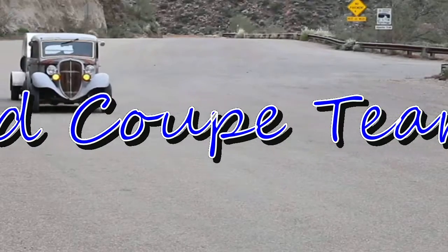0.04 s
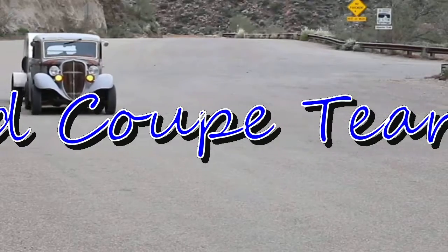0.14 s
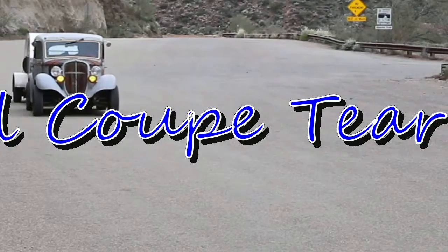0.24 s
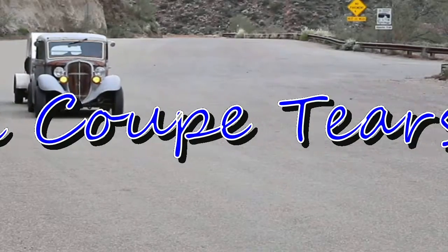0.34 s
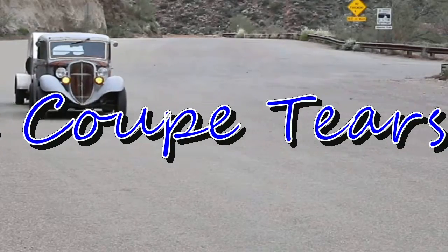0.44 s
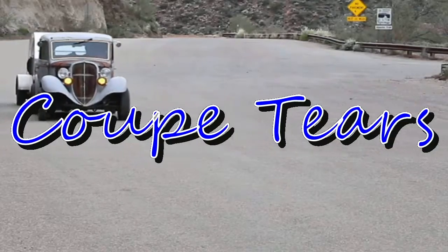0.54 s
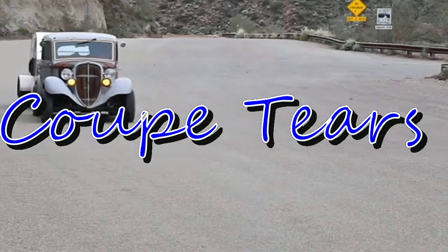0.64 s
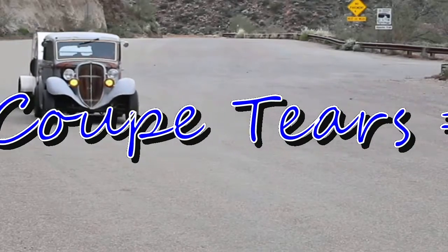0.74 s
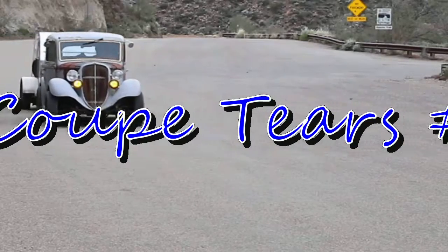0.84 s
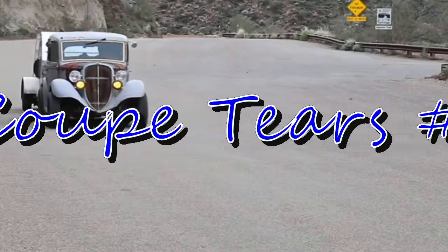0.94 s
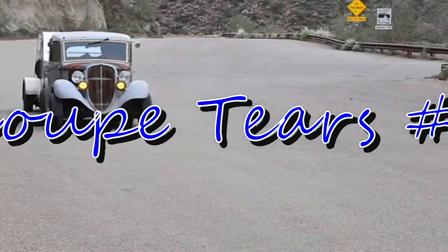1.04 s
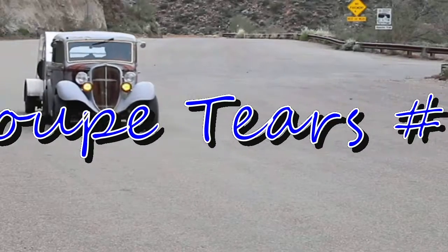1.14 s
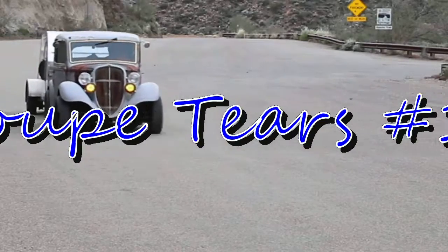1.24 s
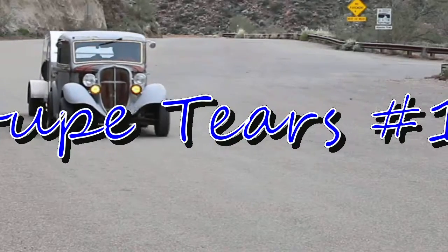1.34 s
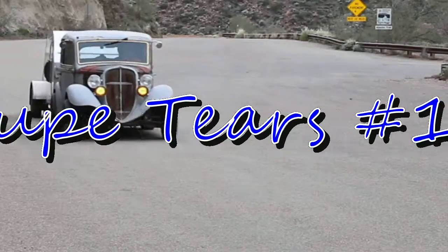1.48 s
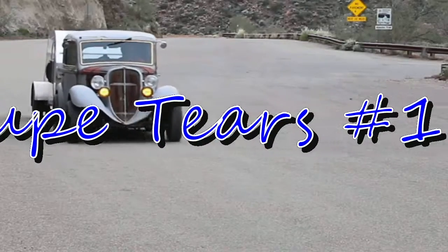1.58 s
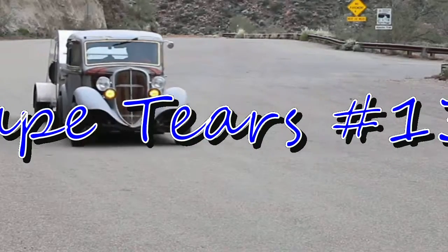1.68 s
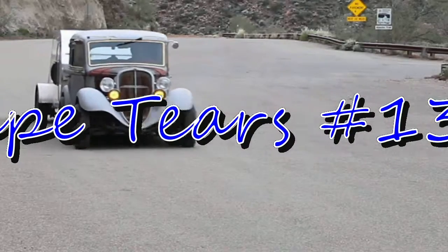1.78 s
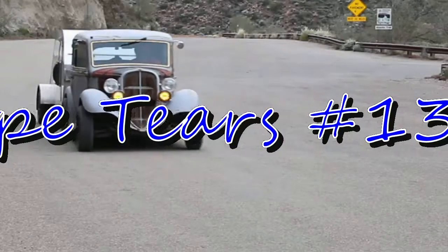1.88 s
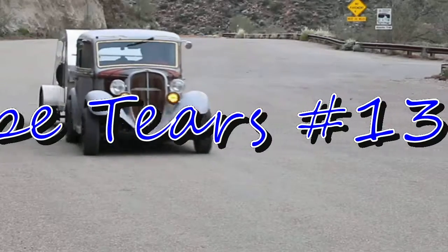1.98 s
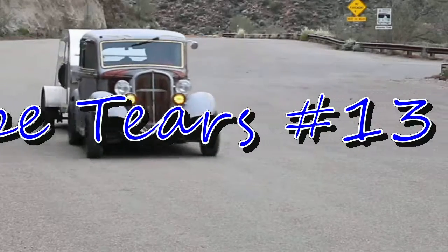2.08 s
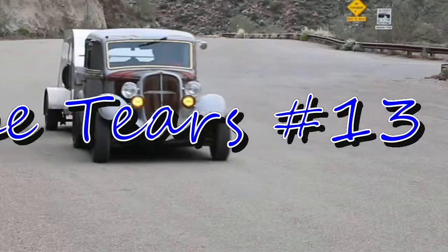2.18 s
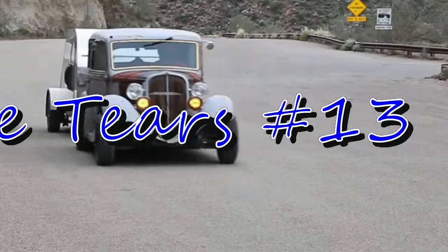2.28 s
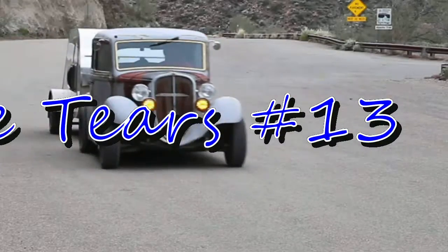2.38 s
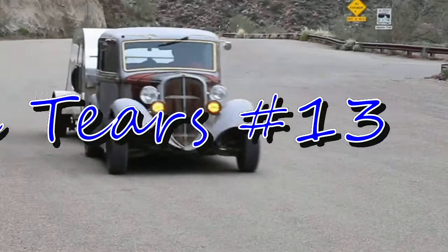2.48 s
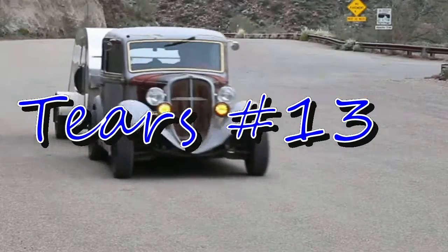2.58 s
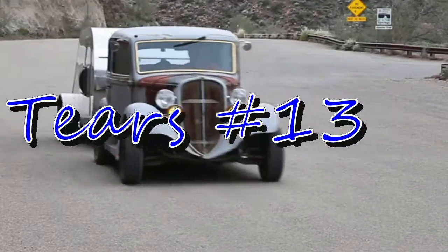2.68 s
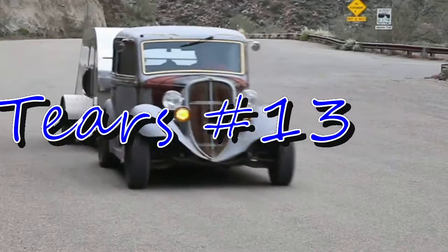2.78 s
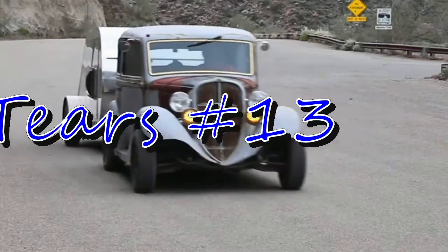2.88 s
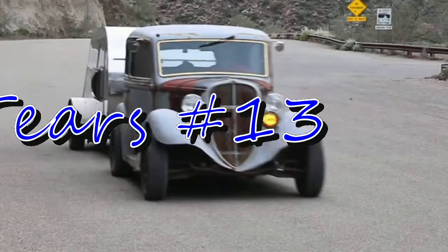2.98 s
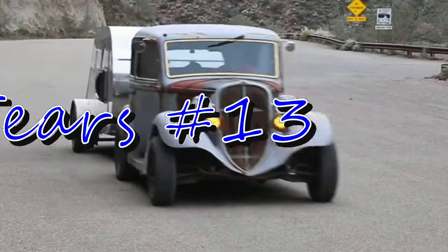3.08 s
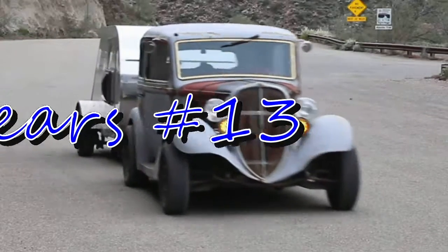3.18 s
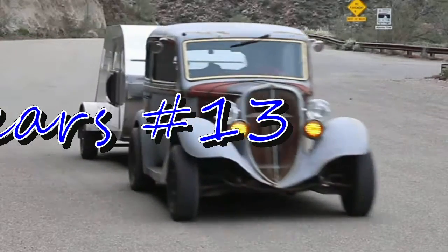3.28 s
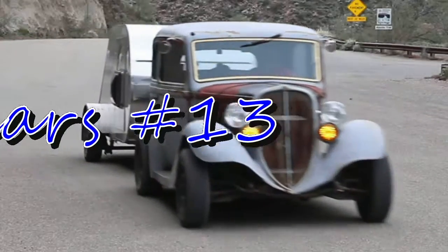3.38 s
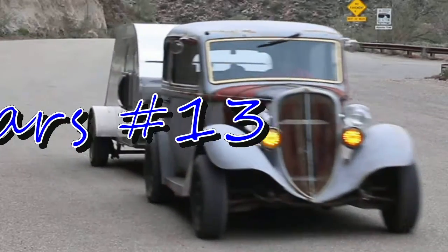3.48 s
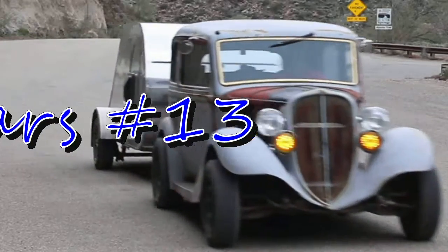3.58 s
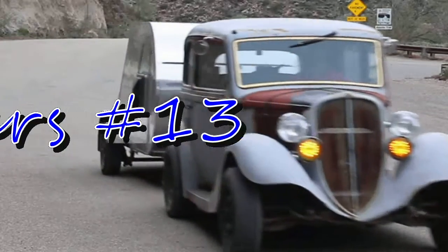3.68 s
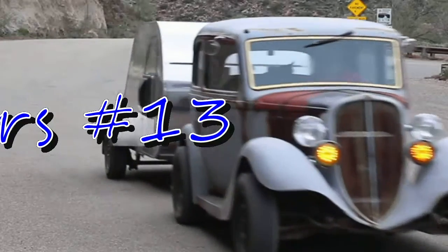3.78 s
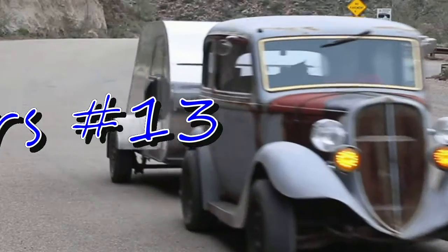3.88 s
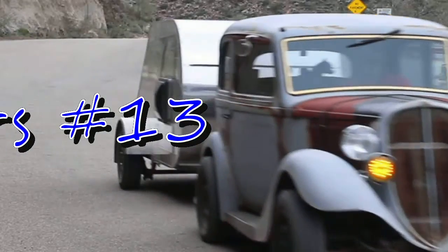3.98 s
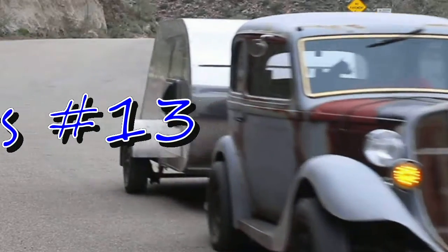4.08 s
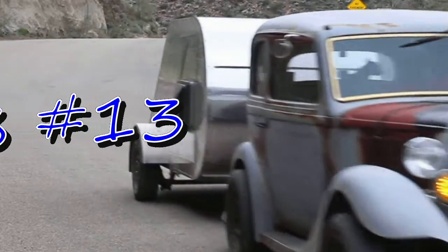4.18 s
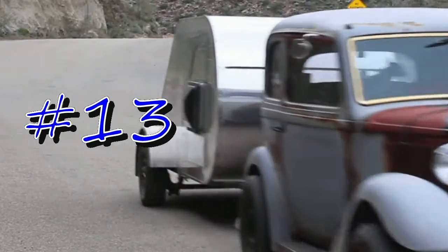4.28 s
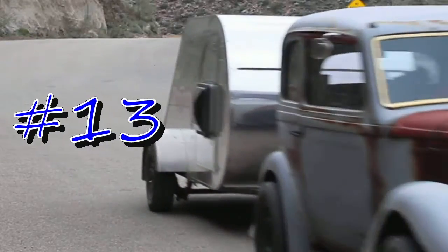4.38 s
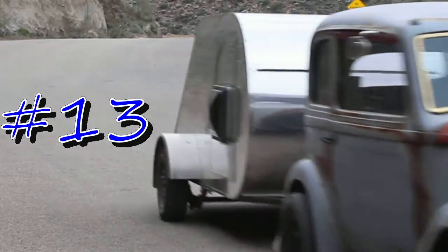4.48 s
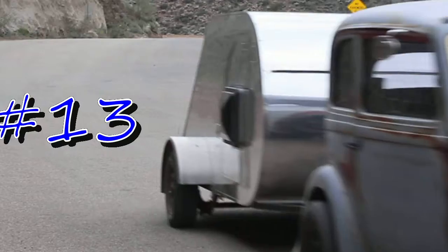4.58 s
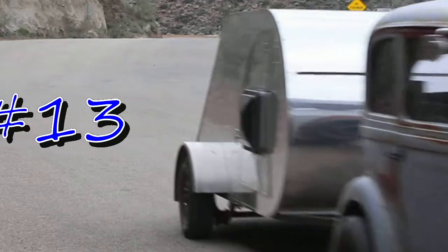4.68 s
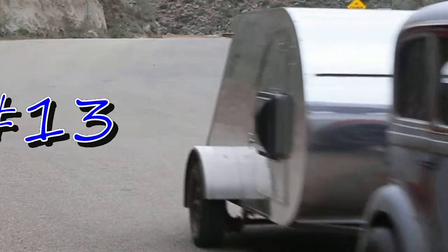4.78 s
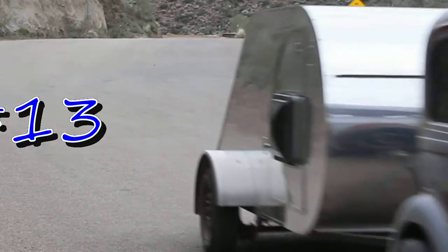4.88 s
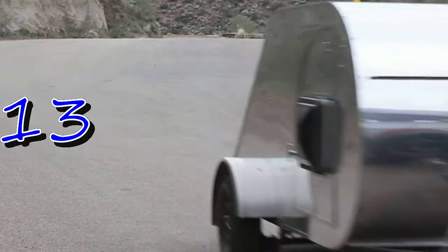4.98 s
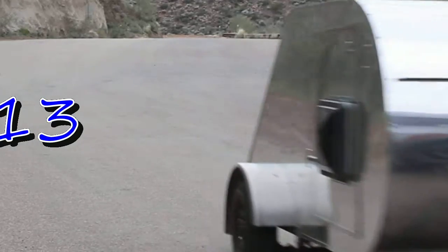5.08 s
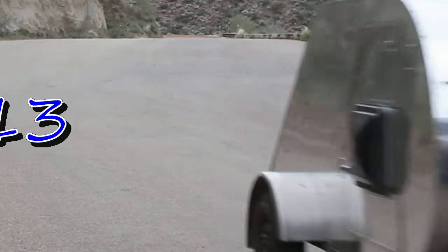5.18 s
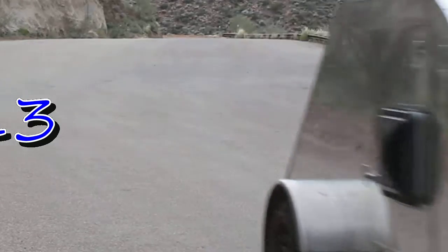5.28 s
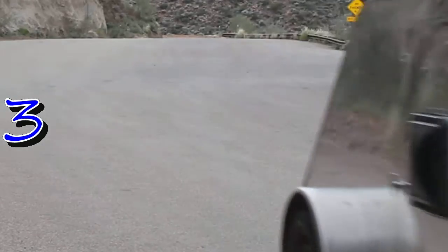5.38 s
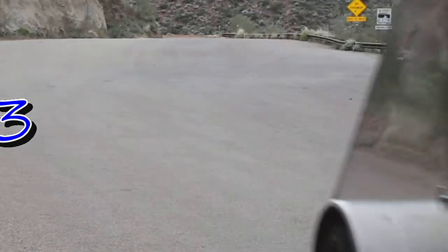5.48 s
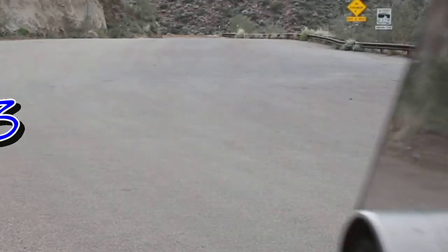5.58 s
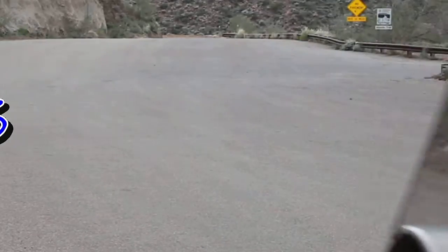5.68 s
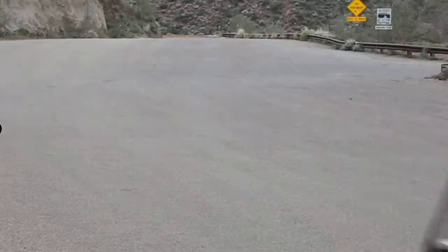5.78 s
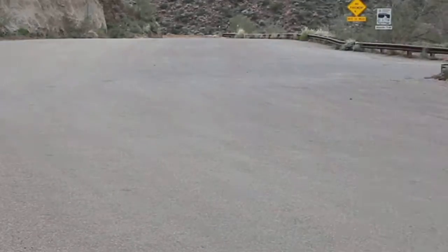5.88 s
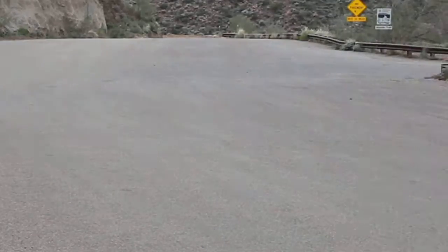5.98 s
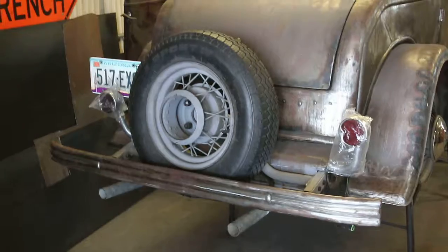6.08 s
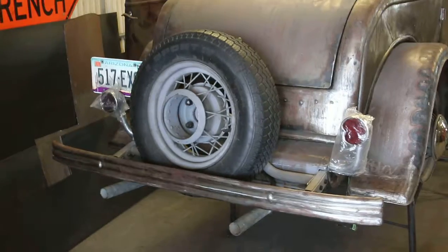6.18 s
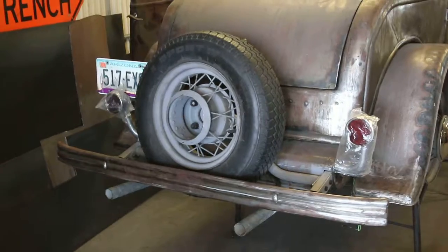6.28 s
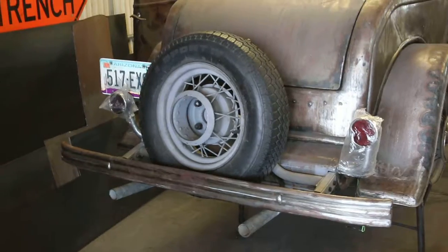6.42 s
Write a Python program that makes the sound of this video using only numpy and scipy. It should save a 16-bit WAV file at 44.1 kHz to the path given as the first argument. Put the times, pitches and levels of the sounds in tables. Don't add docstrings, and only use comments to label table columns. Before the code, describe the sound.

Low engine hum and tyre roar approach, grit crackles loudest as the car and trailer pass, exhaust sputters away, and an indoor room cuts in.

```python
import sys
import numpy as np
from scipy import signal
from scipy.fft import rfft, irfft, next_fast_len
from scipy.io import wavfile

SR = 44100
rng = np.random.default_rng(int(sys.argv[2]) if len(sys.argv) > 2 else 0)


def undo_db(level):
    steps = np.asarray(level, float) / 20
    return 10 ** steps


def to_wav(sig):
    pcm = np.clip(np.atleast_2d(sig), -1, 1) * 32767
    pcm = np.round(pcm).astype(np.int16)
    wavfile.write(sys.argv[1], SR, pcm.T)


N = 284445
TIME = np.arange(N) / SR
PADDED = next_fast_len(N + 4096)
BINS_HZ = np.maximum(np.fft.rfftfreq(PADDED, 1 / SR), 1)
SPEED_M_PER_S, PASSES_AT_M = 2.84, 2.53


def rms_one(x):
    return x / np.sqrt(np.mean(x ** 2) + 1e-20)


def in_time(rows):
    s, *columns = np.transpose(rows)
    return [np.interp(TIME, s, c) for c in columns]


def over_hz(rows):
    hz, *columns = np.transpose(rows)
    return [np.interp(np.log(BINS_HZ), np.log(hz), c) for c in columns]


def shaped(x, response):
    return irfft(rfft(x, PADDED) * response, PADDED)[..., :N]


def highpass(x, hz, order=2):
    return signal.sosfilt(signal.butter(order, hz, "high", fs=SR, output="sos"), x)


def drift(rate_hz):
    r = np.exp(-80 * np.pi * rate_hz / SR)
    slow = signal.lfilter([1], [1, -2 * r, r * r], rng.standard_normal(N // 40 + 2002))
    slow = rms_one(slow[2000:])
    return np.interp(np.arange(N) / 40, np.arange(len(slow)), slow)


def ring(clicks, hz, t60):
    r, w = undo_db(-60 / (t60 * SR)), 2 * np.pi * hz / SR
    return signal.lfilter([0, np.sin(w)], [1, -2 * r * np.cos(w), r * r], clicks + 1e-18)


def ports(common, own, rows):
    lead, balance_db, alike = over_hz(rows)
    alike = np.clip(alike, 0, 1)
    left = undo_db(balance_db / 2) * np.exp(.5j * lead)
    right = undo_db(-balance_db / 2) * np.exp(-.5j * lead)
    pair = np.array([left, right])
    mid = .5 * np.sqrt(alike * abs(pair.sum(0)) ** 2 + (1 - alike) * (abs(pair) ** 2).sum(0))
    shared = shaped(common, pair * np.sqrt(alike) / mid)
    return shared + shaped(own, abs(pair) * np.sqrt(1 - alike) / mid)


def hiss(spectrum, patchy_db, grain):
    hits = rng.random((3, N)) < 900 / SR
    heights = undo_db(4.7 * np.minimum(rng.exponential(1, (3, N)), 5))
    sparse = rms_one(hits * heights * rng.choice([-1, 1], (3, N)))
    raw = np.sqrt(1 - grain) * rng.standard_normal((3, N)) + np.sqrt(grain) * sparse
    flicker = undo_db(patchy_db * (.5 * drift(1.4) + drift(4.4)))
    return rms_one(shaped(raw, undo_db(over_hz(spectrum)[0]))) * flicker


def smooth_step(at_s):
    return .5 + .5 * np.tanh((TIME - at_s) / 0.11)


def heard(db, abreast_s, share, step_db, step_s):
    along = SPEED_M_PER_S * (TIME - abreast_s) / PASSES_AT_M
    return db - share * 10 * np.log10(1 + along ** 2) + step_db * smooth_step(step_s)


def swells(rows, width_s):
    return sum(db * np.exp(-((TIME - s) / width_s) ** 2) for s, db in rows)


def pings(rows, length_s):
    out, near = np.zeros(N), np.arange(-4000, 4000) / SR
    for (s, db, hz), turn in zip(rows, rng.random(len(rows))):
        bell = np.exp(-(near / length_s) ** 2)
        out[round(s * SR) - 4000:][:8000] += undo_db(db) * bell * np.sin(2 * np.pi * (hz * near + turn))
    return out


def garage_air(from_s):
    # (frequency [Hz], density [dB per Hz])
    rumble = [(24, -73), (40, -33), (136, -5), (261, -8), (353, -4), (390, -4.5), (442, -11.5),
              (766, -14.5), (825, -19), (1030, -14), (3440, -24.5), (4640, -38.5), (15800, -55)]
    # (frequency [Hz], width [Hz], level [dB], starts at [s])
    tones = [(1000, 900, -68, 6.11), (119, 8, -60, 6.2), (145.4, 9.1, -57, 6.11), (222, 10, -59.5, 6.11),
             (290, 10, -71, 6.11), (450, 13, -63.5, 6.11), (691, 14, -70, 6.25), (765, 14, -71.5, 6.15),
             (2700, 50, -70, 6.3)]
    # (frequency [Hz], left leads [radians], left-right [dB], likeness [0-1])
    room_ports = [(60, 0, -1.5, 1), (503, 0.0038, 1, 0.99), (1410, 0, 0, 0.74), (3000, 0.0018, -3, 0.13),
                  (8000, 0, -0.5, .05), (15000, 0.00082, 0.5, 0.15)]
    air = undo_db(-54) * hiss(rumble, patchy_db=0.8, grain=0.071)
    white = rng.standard_normal((3, N))
    for hz, width, db, s in tones:
        tone = rms_one(ring(white, hz, 2.2 / width))
        air = air + undo_db(db) * tone * np.clip((TIME - s) / 0.01, 0, 1)
    air = highpass(air, 70, order=4) + motor_whirs(from_s) * [[1], [.3], [.3]]
    fade_in = np.clip((TIME - from_s) / 0.29, 0, 2) ** 0.94
    return ports(air[0], air[1:], room_ports) * fade_in


def motor_whirs(from_s):
    # (time [s], length [s], frequency [Hz], glide [Hz per s], level [dB])
    lines = [
        (6.12, .13, 1500, -800, -67),
        (6.3, .05, 1290, 1500, -69),
        (6.335, 0.12, 2020, -500, -64.5),
        (6.275, .04, 3380, 0, -68),
        (6.33, .06, 3330, 0, -64),
        (6.325, .06, 3545, 0, -68),
        (6.22, 0.105, 380, -100, -58.5),
        (6.33, .13, 352, -60, -60.5),
        (6.385, .08, 985, 0, -68),
        (6.25, 0.065, 2900, 0, -71),
    ]
    out, first = np.zeros(N), round(from_s * SR)
    for s, length, hz, glide, db in lines:
        since = TIME[first:] - s
        wander = np.cumsum(rng.standard_normal(len(since))) * 0.063 * np.sqrt(hz / SR)
        edges = np.clip(np.minimum(since, length - since) / .015, 0, 1)
        phase = 2 * np.pi * (hz + .5 * glide * since) * since + wander
        out[first:] += undo_db(db) * np.sqrt(2) * edges * np.sin(phase)
    return out


def garage_ticks():
    # (time [s], peak [dB], left-right [dB], pitch [ratio])
    knocks = [
        (6.2624, -35, -7, 0.96),
        (6.285, -48, 2, .95),
        (6.4253, -32, -6, 0.875),
        (6.4482, -49, -1, 1.6),
    ]
    # (frequency [Hz], level [dB], t60 [s])
    modes = [(2000, -19, 0.0051), (2500, -15, 0.0047), (2900, -4.5, 0.011), (3740, 2.5, 0.0077),
             (4600, -12, 0.0035), (6300, -5.5, 0.0044), (12800, -20, 0.0027)]
    lag_at_1khz_s = .002
    out = np.zeros((2, N))
    for s, db, pan_db, pitch in knocks:
        at = round(s * SR)
        for k, (hz, mode_db, t60) in enumerate(modes):
            clicks = np.zeros((2, min(900, N - at)))
            starts = rng.integers(0, 4, 2) + round(lag_at_1khz_s * SR * 1000 / hz)
            heights = undo_db(db + mode_db - 8.0 + pan_db * np.array([.5, -.5]))
            clicks[[0, 1], starts] = -(-1) ** k * heights
            out[:, at:at + 900] += ring(clicks, hz * pitch ** (hz < 5000), t60)
    return out


def garage():
    return garage_air(from_s=6.106) + garage_ticks()


def preamp_hiss():
    # (frequency [Hz], density [dB per Hz])
    colour = [(3000, -18), (8000, -3), (16500, -6)]
    return undo_db(-76.5) * hiss(colour, patchy_db=1.5, grain=0.011)


def tyre_roar(burst):
    # (frequency [Hz], density [dB per Hz])
    roar_colour = [(70, -22), (120, -9), (200, -13.5), (232, -4), (280, -8.5), (344, -6.5), (414, -12),
                   (654, -15), (1100, -21.5), (1430, -25), (2420, -120)]
    # (frequency [Hz], density [dB per Hz])
    rumble_colour = [(18, 21), (35, 11), (62, -3), (160, -24), (220, -37), (400, -46)]
    roar_db = heard(-51.5, abreast_s=4, share=.5, step_db=-4.5, step_s=5.5)
    roar = undo_db(roar_db) * hiss(roar_colour, patchy_db=0.2, grain=0.045) * (1 + 0.052 * burst)
    rumble = undo_db(-64 + 0.02 * (roar_db + 52)) * hiss(rumble_colour, patchy_db=0.0, grain=0.013)
    body_db = heard(-61, abreast_s=4.5, share=1.5, step_db=-3, step_s=4)
    body_width_hz = 31
    body = rms_one(ring(rng.standard_normal((3, N)), 789, 4.2 / body_width_hz))
    return roar + rumble + undo_db(body_db) * body * [[1], [.5], [.5]]


def rushing_air():
    # (frequency [Hz], density [dB per Hz])
    colour = [(5000, -6), (6500, -2.5), (8000, -3), (9300, -6.5), (11000, -10.5), (14000, -23), (16500, -9)]
    air_db = heard(-68.3, abreast_s=4, share=0.84, step_db=8, step_s=5)
    return undo_db(air_db + 1.3 * drift(9)) * hiss(colour, patchy_db=1.2, grain=.07)


def manifold_fizz(angle):
    # (frequency [Hz], density [dB per Hz])
    colour = [(8500, -35), (9800, 1), (12000, 1), (13500, 3), (14800, 4), (16500, -2)]
    leads_cycles = .27
    fizz_db = heard(-74, abreast_s=5.0, share=2, step_db=-8, step_s=6)
    spit = puffs(angle + 2 * np.pi * leads_cycles)
    return undo_db(fizz_db) * spit * hiss(colour, patchy_db=2.3, grain=.2)


def grit_tread(burst):
    # (frequency [Hz], density [dB per Hz])
    colour = [(530, -10.5), (900, 1), (1100, -3.5), (1530, -2), (3290, -7), (4070, -8.5), (5030, -10.5),
              (6450, -18.5), (7500, -28), (9750, -32), (16500, -120)]
    # (time [s], level [dB])
    patches = [(1.1, 1.7), (1.84, 4.8), (1.89, 2), (2.13, 3.2), (2.26, 2.3), (2.49, 2.07), (2.6, 4.5),
               (3.29, 3), (3.655, 1.5), (4.185, 4.1), (4.265, 3.1), (4.62, 1.44), (2.9, 2.1), (5.41, 2.1)]
    grit_db = heard(-50.77, abreast_s=5, share=1.0026, step_db=-0.02, step_s=8) + swells(patches, 0.016)
    tread = hiss(colour, patchy_db=0.3, grain=0.063)
    coarse = signal.sosfilt(signal.butter(2, 2500, fs=SR, output="sos"), tread)
    coarse_db = 1.0 * drift(12.5) - 3.5 * smooth_step(5.27)
    fine_db = 1.3 * drift(9.8) - 2.5 * np.clip(1 - TIME / 3, 0, 1)
    fine = (tread - coarse) * undo_db(fine_db) * (1 + 0.068 * (burst - burst.mean()))
    return undo_db(grit_db) * (coarse * undo_db(coarse_db) + fine)


def stone_snaps():
    # (time [s], peak [dB], frequency [Hz], crack [dB])
    stones = [(0.126, -47, 1810, 2), (0.249, -50, 2130, -3), (.8375, -49, 1790, -6), (.8844, -50, 2140, -3),
              (1.109, -50, 2240, 4), (1.831, -42, 1860, -3), (1.8682, -51, 1940, -5),
              (1.9011, -45, 2190, -6), (2.114, -44, 3550, 1), (2.589, -41.5, 2050, -1),
              (2.7546, -45, 1620, -6), (2.8864, -52, 1870, 8), (3.5437, -38, 2300, 2),
              (3.825, -42, 2863, 6), (4.1744, -33.5, 2200, 2), (4.2457, -28, 2000, -5),
              (4.2594, -34.5, 2150, -4), (4.5227, -34, 1560, -9), (4.596, -27.5, 1950, 1.5),
              (4.6203, -33, 2000, -5), (4.6941, -36, 2220, -8), (4.6993, -35, 2100, -6),
              (4.8785, -39, 1800, -6), (4.8825, -39, 2400, 9), (5.03, -39, 2620, -6),
              (5.392, -32, 1500, -9), (5.3967, -34.5, 2380, 2), (5.4246, -37, 2310, -3),
              (5.445, -36, 1700, -9)]
    # (time [s], level [dB], frequency [Hz], length [s])
    rattles = [(1.2, -58, 4200, .006), (2.148, -55, 2300, 0.005), (2.221, -56.5, 2840, 0.0054),
               (2.245, -54, 2340, 0.0055), (2.279, -56.5, 2900, .006), (2.37, -61, 2900, .006),
               (2.49, -51.5, 2960, .006), (2.781, -56, 2760, .005), (3.289, -49.5, 2370, .009),
               (3.3, -53, 2200, .004), (3.316, -56, 2500, 0.0071), (3.373, -57, 3900, 0.0082),
               (3.398, -64, 4600, .007), (3.462, -61, 3900, 0.0074), (3.644, -53, 2500, .006),
               (3.665, -59, 2400, .009), (4.265, -51, 2000, .006), (4.277, -53, 2600, .002),
               (1.878, -59, 2310, .008), (2.12, -58, 3000, .005), (4.634, -52, 2900, .006),
               (4.707, -51, 3900, 0.0063), (5.096, -58, 4650, 0.005)]
    rattle_width_hz = 300
    out = np.zeros(N)
    for (s, db, hz, crack_db), sign in zip(stones, rng.choice([-1, 1], len(stones))):
        click = np.zeros(400)
        click[0] = sign * undo_db(db)
        crack = ring(click, 3300, .002) - 0.56 * ring(click, 5800, 0.0011)
        at = round((s + 0.0006) * SR)
        out[at:at + 400] += ring(click, hz, .0055) + undo_db(crack_db) * crack
    near = np.arange(-1000, 1000) / SR
    for s, db, hz, length in rattles:
        shaken = rms_one(ring(rng.standard_normal(2000), hz, 2.2 / rattle_width_hz))
        out[round(s * SR) - 1000:][:2000] += undo_db(db) * shaken * np.exp(-(near / length) ** 2)
    return highpass(out, 1250)


def chassis_pings():
    # (time [s], peak [dB], frequency [Hz])
    pebbles = [(0.456, -73, 3620), (0.602, -72, 4130), (0.771, -72, 4650), (1.345, -73, 5080),
               (1.84, -68, 4950), (1.842, -68, 4310), (1.853, -65, 3450), (2.509, -68, 5170),
               (3.354, -62, 4010), (3.447, -62, 3960), (3.783, -61, 4050), (4.011, -63, 5600),
               (4.032, -61, 4650), (4.048, -54, 2930), (4.188, -59, 4950), (4.342, -55, 3630),
               (4.364, -58, 5080), (4.455, -58, 4820), (4.737, -60, 5210), (4.782, -64, 5340),
               (4.843, -49, 3880), (4.934, -61, 5000), (5.062, -53, 1810)]
    return pings(pebbles, 0.0081)


def splinters():
    # (time [s], peak [dB], frequency [Hz])
    breaks = [(1.0995, -57, 5800), (1.506, -56, 5600), (2.106, -53, 5760), (2.443, -54, 7500),
              (2.5105, -49, 6800), (4.188, -44, 4200), (4.26, -39, 4600), (4.272, -58, 7500),
              (4.5897, -49, 6500), (5.2997, -44, 6000), (5.4592, -44, 6000), (5.484, -54, 9000)]
    out, since = np.zeros(N), np.arange(400) / SR
    for s, db, hz in breaks:
        band = signal.butter(2, [.72 * hz, 1.35 * hz], "band", fs=SR, output="sos")
        split = signal.sosfilt(band, rng.standard_normal(400) * np.exp(-since / .0011))
        out[round(s * SR):][:400] += undo_db(db) * split / abs(split).max()
    return out * undo_db([[1], [-1]])


def spring_squeak():
    bell = np.exp(-((TIME - 3.846) / 0.0065) ** 2)
    return undo_db(-55) * bell * np.sin(2 * np.pi * 5180 * TIME) * [[1.3], [.7]]


def panel_hums():
    # (time [s], peak [dB], frequency [Hz])
    notes_sung = [(0.37, -65, 866), (0.52, -70, 1367), (0.6, -69, 1189), (0.62, -66, 866), (0.8, -67, 990),
                  (0.84, -59, 669), (0.92, -73, 1378), (0.96, -63, 667), (1.06, -74, 1297),
                  (1.21, -67, 1033), (1.25, -69, 1135), (1.42, -63, 663), (1.5, -72, 1200),
                  (1.56, -60, 650), (1.67, -61, 650), (1.82, -62, 827), (2.21, -59, 592), (2.58, -70, 1370),
                  (2.69, -65, 1017), (2.74, -67, 1320), (2.77, -67, 1378), (3.05, -60, 818),
                  (3.07, -67, 1345), (3.51, -58, 678), (3.54, -60, 1290), (3.55, -58, 984),
                  (3.75, -58, 750), (4.14, -52, 794), (4.24, -59, 1286), (4.26, -58, 1180),
                  (4.46, -54, 776), (4.48, -56, 882), (4.52, -60, 1263), (4.7, -57, 1159), (5.04, -60, 780),
                  (5.06, -60, 1049), (5.11, -56, 759), (5.22, -52.5, 884), (5.4, -57, 1286),
                  (5.68, -58, 1152), (5.68, -59, 764), (5.77, -61, 880), (5.83, -52, 770), (5.86, -57, 936),
                  (5.87, -57, 1141), (5.87, -57, 1302), (5.88, -54, 987)]
    return pings(notes_sung, .035)


def puffs(angle):
    since = angle / (2 * np.pi) % 1
    return rms_one((1 - np.exp(-since / .025)) * np.exp(-since / .33) + .1)


def tailpipe(burst):
    # (frequency [Hz], width [Hz], level [dB])
    resonances = [(975, 150, -2.5), (1530, 240, -2.5), (2810, 190, -0.5), (3750, 280, -0.5),
                  (4130, 400, 0.5), (4600, 620, 0), (6500, 3900, -6)]
    # (time [s], peak [dB], frequency [Hz])
    caught = [(5.502, -48, 2760), (5.523, -50, 3750), (5.545, -51, 3700), (5.593, -47, 2950),
              (5.634, -55, 2840), (5.679, -51, 2760), (5.705, -50, 4070), (5.727, -52, 2670),
              (5.754, -46, 3700), (5.776, -47, 3900), (5.796, -47, 4610), (5.85, -41, 4010),
              (5.873, -49, 2760), (5.888, -47, 3660), (5.912, -47, 3620), (5.94, -47, 4010),
              (5.96, -41, 3000), (5.983, -48, 4480), (6.011, -47, 2630), (6.03, -44, 4480),
              (6.053, -42, 2890)]
    right_down_db = 9.5
    gas = rng.standard_normal((2, N)) * [[1], [.6]] + [[0], [.8]] * rng.standard_normal(N)
    out = 0
    for hz, width, db in resonances:
        rung = ring(ring(gas * burst, hz, 1.6 / width), hz, 1.6 / width)
        out = out + undo_db(db + 1.6 * drift(30)) * rms_one(rung)
    out = rms_one(highpass(out, 500)) * 2 * undo_db([[0], [-right_down_db]])
    pipe_db = heard(-50.5, abreast_s=6.5, share=3.5, step_db=7.5, step_s=5.5)
    pipe_db = pipe_db + swells([(5.82, 2.0)], 0.092) + 1.1 * drift(16)
    return undo_db(pipe_db) * out + pings(caught, 0.0072) * [[1.4], [.55]]


def crank_angle():
    # (time [s], frequency [Hz])
    cycle = [(0, 48.28), (0.6, 47.76), (1.5, 46.64), (2.4, 45.7), (2.85, 45.42), (4.65, 44.1), (6.1, 42.66)]
    return 2 * np.pi * np.cumsum(in_time(cycle)[0]) / SR + .4 + 0.038 * drift(5.3)


def engine(angle):
    # (order [number], level at start [dB], level at the pass [dB])
    weak_orders = [(1, -61.5, -59), (6, -96, -56.5), (7, -58.5, -71.5), (8, -75.5, -63.5), (10, -74.5, -77),
                   (13, -74, -69.5), (14, -74, -72.5), (15, -73.5, -76), (17, -76, -67.5)]
    # (time [s], strength [0-2], phase [turns])
    cliff = [(-.06, 1.7, 0), (.43, .45, 1), (.91, 1.02, 2), (1.4, .9, 2.82), (1.63, .97, 3),
             (1.95, .9, 3.5), (2.58, .85, 4), (3.86, .2, 5), (4.36, .35, 5.5), (4.67, .2, 6),
             (4.82, .15, 6.5), (5.24, .2, 7), (5.42, .15, 7.5), (6.44, .5, 7.5)]
    # (time [s], level [dB])
    gear_gaps = [(3.16, 7.5), (3.3, -1), (3.68, -13), (3.9, 0), (4.1, 0), (4.33, -0.5), (4.43, 5),
                 (4.5, -6), (4.62, 1), (4.75, -8), (4.87, 4), (4.95, -2), (5.08, 7.5), (5.22, -7),
                 (5.32, 3)]
    # (order [number], time [s], level [dB], width [s])
    order_swells = [(2, 2.1, 0.5, .3), (2, 3.9, 1, 0.36), (2, 5.22, -2, 0.42), (3, 0.087, -1, .4),
                    (3, 1.62, 1, 0.27), (3, 4.16, 1.5, 0.35), (3, 5.14, 1, 0.33), (4, 2.23, 4, 0.22),
                    (4, 4.1, 4, 0.16), (5, 0.27, -1.5, 0.46), (5, 1.32, -1.5, 0.42), (7, .2, 2, .15),
                    (1, 4.3, 3, .1), (1, .4, -3, .1), (7, 1.41, 5.5, .1), (7, 2.21, 6, 0.14), (7, 1.04, -3, .2)]
    # (time [s], level [dB])
    stumbles = [
        (0.0, 0.5),
        (2.08, -2.5),
        (3.15, -2.5),
        (4.65, -1),
    ]
    early = {2: .35, 4: -.3, 5: 1.0, 7: 3.1}
    gear = 14.14
    levels = {
        2: heard(-37.5, abreast_s=5, share=1.25, step_db=0.5, step_s=3),
        3: heard(-37, abreast_s=3.5, share=0.59, step_db=-1.5, step_s=6.5),
        4: heard(-53, abreast_s=7, share=0.07, step_db=-11.5, step_s=4.5) + 0.5 * drift(4),
        5: heard(-52, abreast_s=5.5, share=-0.56, step_db=-10, step_s=5.5),
        gear: heard(-68.5, abreast_s=4, share=0.77, step_db=9, step_s=3),
    }
    levels[gear] = levels[gear] - 0.5 * drift(2.8) + swells(gear_gaps, 0.053)
    echo, turns = in_time(cliff)
    echo_turn = np.exp(2j * np.pi * turns)
    levels[2] = levels[2] + 20 * np.log10(abs(1 - echo * echo_turn) + .03)
    nearness = np.clip(TIME / 4.9, 0, 1)
    for k, far, near in weak_orders:
        levels[k] = far + (near - far) * nearness - 0.8 * (k - 2) * smooth_step(5.46)
    for k, s, db, width_s in order_swells:
        levels[k] = levels[k] + swells([(s, db)], width_s)
    pull = np.angle(1 - np.minimum(echo, .95) * echo_turn) + 1.4 * np.clip(1 - TIME / 2.0, -.1, 1)
    stumble_db = swells(stumbles, 0.073)
    out = 0
    for k, db in levels.items():
        uneven = undo_db(db + stumble_db + 0.22 * min(k, 5) * drift(min(26, 4.5 * k)))
        lag = 1.42 * (k % 2) - early.get(k, 0) + pull * (k == 2)
        out = out + np.sqrt(2) * uneven * np.cos(k * angle + 0.035 * min(k, 12) * drift(2.6) - lag)
    return out


def road():
    # (frequency [Hz], left leads [radians], left-right [dB], likeness [0-1])
    road_ports = [(40, 1.15, 4.5, .97), (90, 1.33, 5, .99), (220, 2.0, 5, .99), (500, 2.6, 5, .95),
                  (1000, 2.7, 4.5, .85), (3000, 2.8, 1.5, .73), (5000, 3.3, .5, .77), (7000, 4.9, 2, .1),
                  (9000, 7.0, 3, .3), (12000, 9.2, 2.3, .65), (15000, 9.5, 2, .6)]
    angle = crank_angle()
    hum = engine(angle) + panel_hums()
    puff_angle = angle - angle[round(6.0728 * SR)]
    burst = puffs(puff_angle)
    wide = tyre_roar(burst) + rushing_air() + manifold_fizz(puff_angle) + preamp_hiss()
    low = ports(hum + wide[0], wide[1:], road_ports)
    grit, snaps = grit_tread(burst), stone_snaps() + chassis_pings()
    bearing = np.arctan(SPEED_M_PER_S * (TIME - 5.42) / PASSES_AT_M)
    pan_db = 7.0 + 8.5 * np.sin(bearing)
    high = ports(grit[0] + snaps, grit[1:] + snaps * [[.8], [-.4]], road_ports)
    high = high * undo_db(pan_db * [[.3], [-.7]])
    fade = np.clip((6.11 - TIME) / 1.1, 0, 1) * np.clip((6.089 - TIME) * 200, 0, 1)
    return (low + high + splinters() + spring_squeak() + tailpipe(burst)) * fade


def scene():
    return garage() + road()


def low_pass(x):
    return signal.sosfilt(signal.butter(12, 15750, fs=SR, output="sos"), x)


def record(dry):
    cut = signal.sosfilt(signal.ellip(10, .3, 60, 15750, fs=SR, output="sos"), dry)
    return low_pass(cut)


dry = scene()
out = record(dry)
to_wav(out)
```